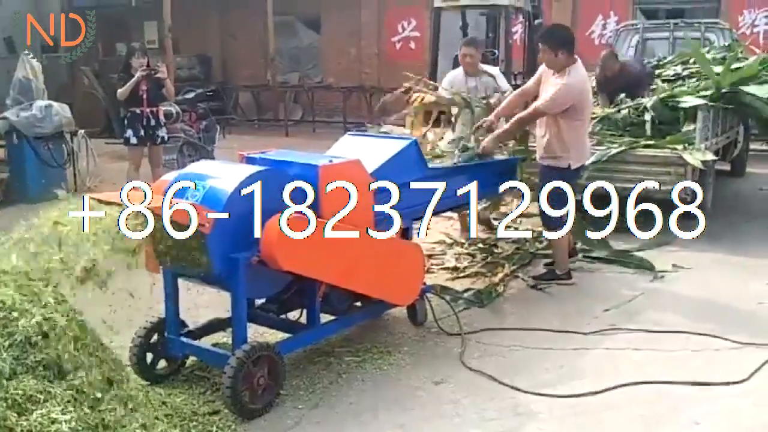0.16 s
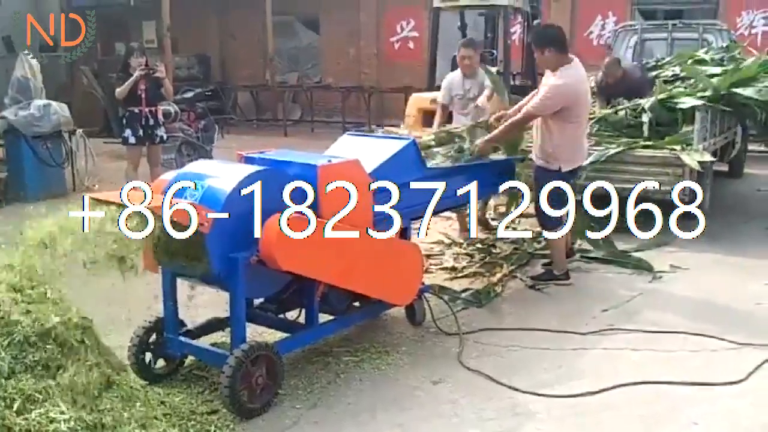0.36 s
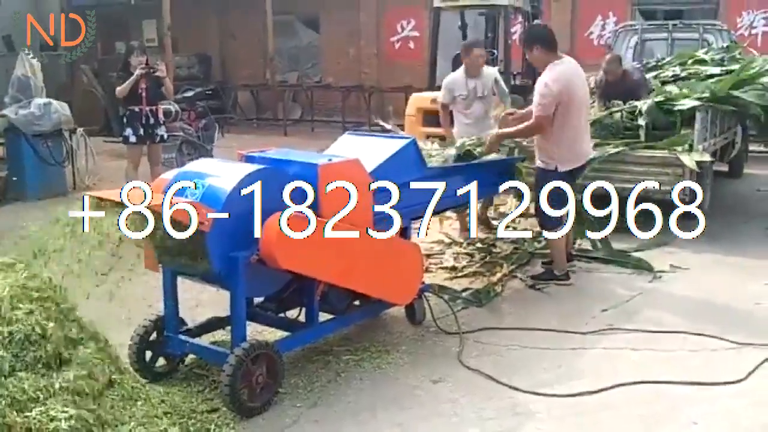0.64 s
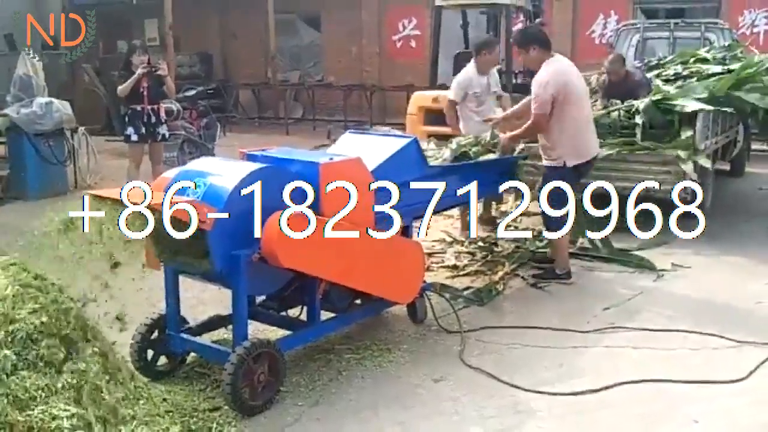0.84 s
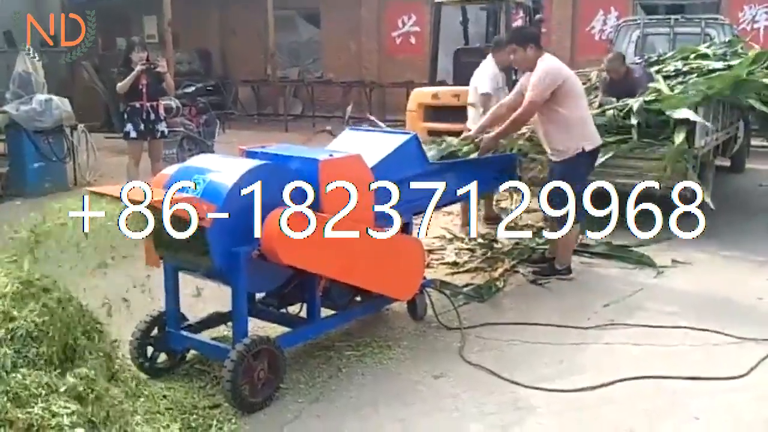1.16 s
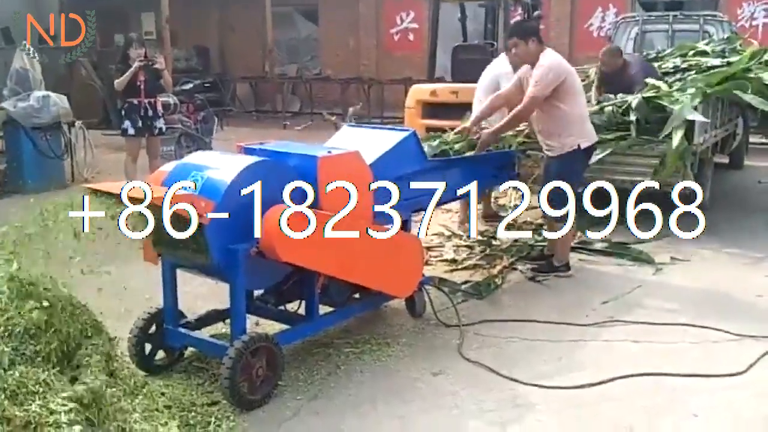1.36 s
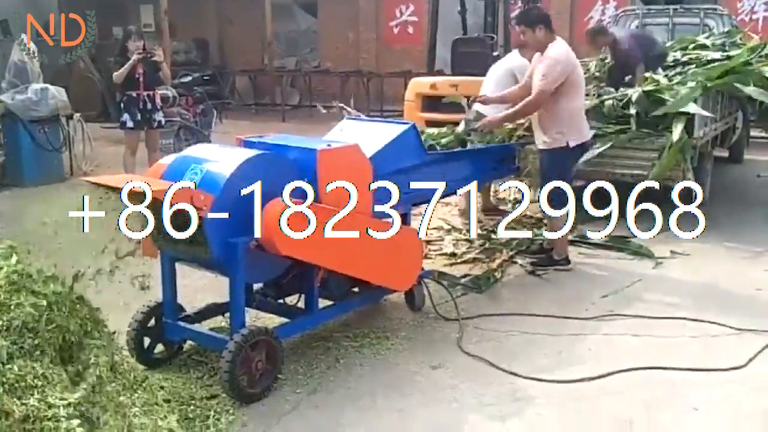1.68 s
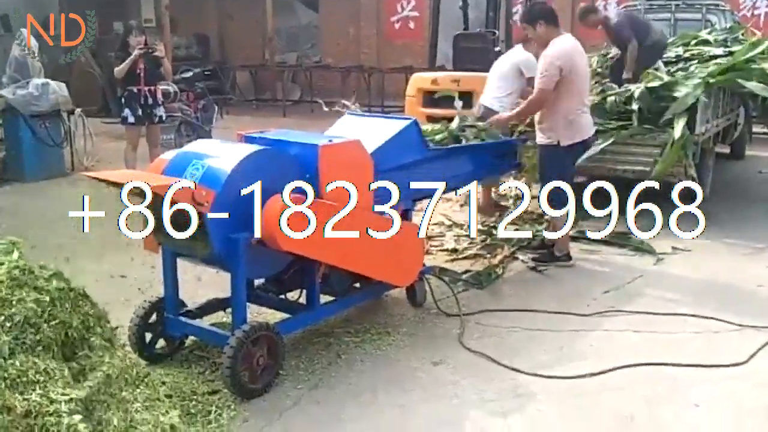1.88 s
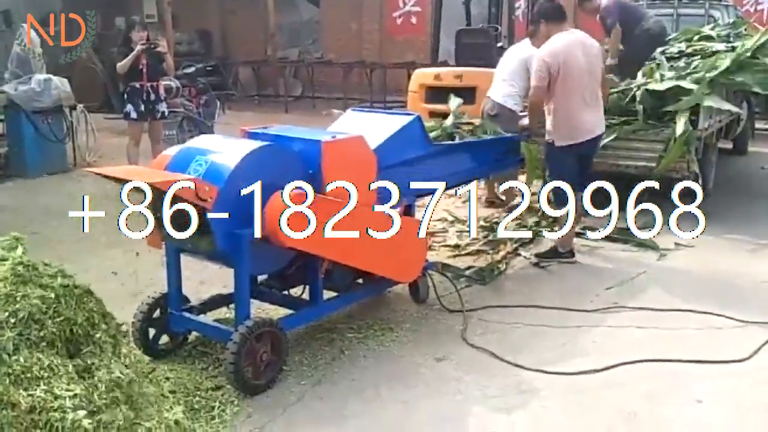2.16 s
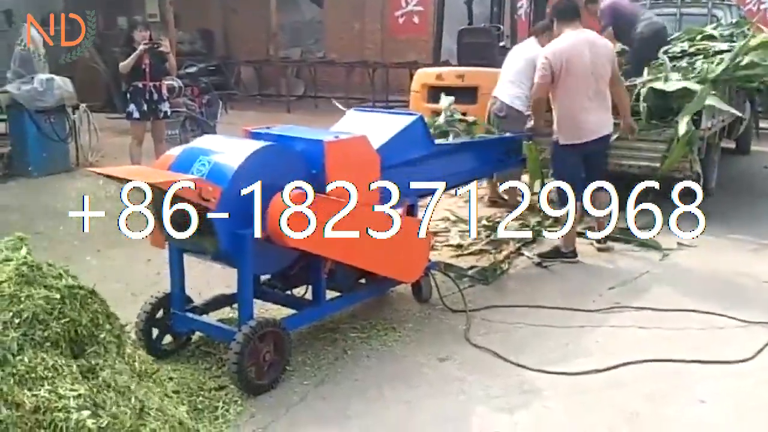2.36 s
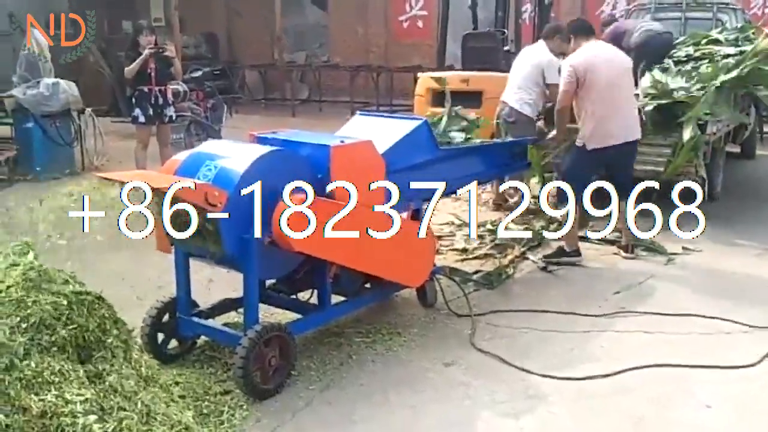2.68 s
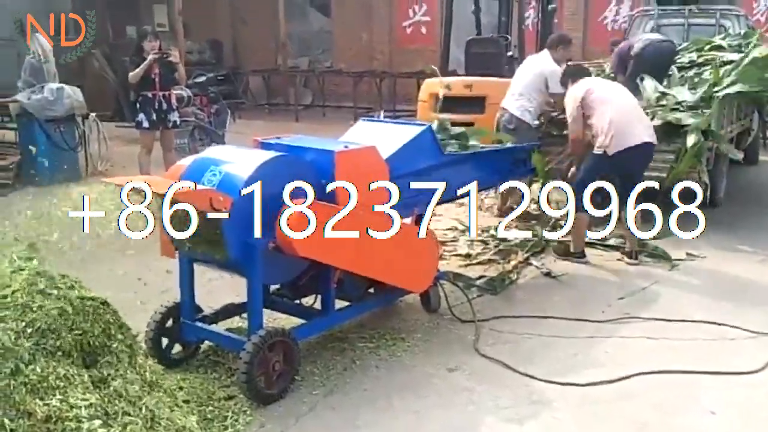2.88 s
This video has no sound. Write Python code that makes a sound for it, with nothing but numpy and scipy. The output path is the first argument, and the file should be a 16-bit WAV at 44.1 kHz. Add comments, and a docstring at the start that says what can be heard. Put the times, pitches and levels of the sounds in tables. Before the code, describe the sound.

Loud stalk-chopping machine outdoors, a few metres from a handheld microphone: low hum, rushing air and dense metallic rattle, easing around two seconds after wind buffeting on the right, then growing harsher toward the end.

```python
"""Chaff cutter in a windy yard

A motor-driven chaff cutter runs in an open yard, a few metres from a hand-held two-port microphone.
The knife drum hums as sines at multiples of its turning speed; air roars in the housing as shaped noise.
Cut stalk pieces pelt the sheet metal as dense ticks, more or less as the feed changes, and the outlet
chute rings as narrow bands of noise. A gust buffets the right port with low noise and short thumps."""
import sys
import numpy as np
from scipy import signal
from scipy.fft import rfft, irfft
from scipy.io import wavfile
from scipy.ndimage import uniform_filter1d

SR = 44100
rng = np.random.default_rng(int(sys.argv[2]) if len(sys.argv) > 2 else 0)


def store_pcm(level_fs):
    """Save levels as 16-bit WAV."""
    pcm = np.round(np.clip(level_fs, -1, 1) * 32767).astype(np.int16)
    wavfile.write(sys.argv[1], SR, np.atleast_2d(pcm).T)


def level_to_linear(level):
    """Convert decibel levels to linear amplitude factors, elementwise."""
    exponent = np.asarray(level, float) / 20
    return 10 ** exponent


N = 133182  # samples


def table(rows, col, at):
    """One column joined by straight lines."""
    rows = np.array(rows, float)
    return np.interp(at, rows[:, 0], rows[:, col])


def bin_hz():
    """Frequency of every FFT bin."""
    return np.arange(N // 2 + 1) * SR / N


def over_hz(rows, col):
    """One column on every FFT bin, joined on a log-frequency axis."""
    rows = np.array(rows, float)
    return np.interp(np.log(bin_hz() + 1), np.log(rows[:, 0]), rows[:, col])


def unit(x):
    """Scale to rms 1."""
    return x / np.sqrt(np.mean(x ** 2))


def walk(rate_hz):
    """Slow random wander: levels held for 1 / rate and smoothed twice; spread 1."""
    hold = int(SR / rate_hz)
    steps = np.repeat(rng.standard_normal(400), hold)[:N]
    smooth = uniform_filter1d(uniform_filter1d(steps, hold), hold)
    return unit(smooth - smooth.mean())


def bump(t, s, length):
    """A smooth bell-shaped swell centred on s; length is twice its standard deviation."""
    return np.exp(-.5 * ((t - s) / (length / 2)) ** 2)


# How the two ports hear a sound (f/Hz, likeness from 0 to 1, left minus right level/dB)
PORT_MATCH = [(60, 1, 9), (344, 1, -1), (865, 0.86, -1), (1213, 0.63, 2), (1340, 0, -3), (1820, 0.25, 1.5),
              (2560, 0.1, 6.5), (2660, 0.86, 2), (4600, 0.7, -0.5), (5560, 0, -3), (7340, 0.1, -10)]
RIGHT_LAG_S = .00006


def ports(a, b, gain):
    """Colour two unrelated streams and share them between the ports by likeness, balance and lag."""
    like = np.clip(over_hz(PORT_MATCH, 1), 0, 1)
    half = level_to_linear(over_hz(PORT_MATCH, 2) / 2)
    first, second = rfft(a) * gain, rfft(b) * gain
    lag = np.exp(-2j * np.pi * bin_hz() * RIGHT_LAG_S)
    left = first * half
    right = (like * first * lag + np.sqrt(1 - like ** 2) * second) / half
    return unit(np.array([irfft(left, N), irfft(right, N)]))


FLICKER_DB, FLICKER_HZ = 2.6, 28


def flicker(x):
    """Each quarter-octave band from 30 Hz up wavers in level on its own."""
    spec, out = rfft(x), 0
    step = np.clip(4 * np.log2(bin_hz() / 30 + 1e-9), 0, 32)
    for band in range(33):
        share = np.clip(1 - abs(step - band), 0, 1)  # neighbouring bands crossfade
        out = out + irfft(spec * share, N) * level_to_linear(FLICKER_DB * walk(FLICKER_HZ))
    return unit(out)


# Turning speed of the drum shaft (t/s, turns per s)
SHAFT_SPEED = [(0, 40.8), (.3, 41), (.6, 41.4), (1.1, 41.3), (2.2, 41.1), (2.55, 41.2), (2.7, 42),
               (3.02, 41.7)]


def shaft(t):
    """Angle of the knife drum in radians, adding up its turning speed."""
    return 2 * np.pi * np.cumsum(table(SHAFT_SPEED, 1, t)) / SR


HUM_WOBBLE_DB, HUM_WOBBLE_HZ = 1.2, 14
HUM_PORT_RAD = 0.098  # spread of the phase gap between ports; grows with the root of the order


def tone(angle, order, db):
    """A sine of the given rms level, wavering in level and a little out of step between the ports."""
    level = np.sqrt(2) * level_to_linear(db + HUM_WOBBLE_DB * walk(HUM_WOBBLE_HZ))
    start = 2 * np.pi * rng.random()
    drift = HUM_PORT_RAD * np.sqrt(order) * walk(HUM_WOBBLE_HZ) * np.array([[.5], [-.5]])
    return level * np.sin(angle + start + drift)


# The machine's changing loudness, also played by roar, sheet, chute and pelting
# (t/s, upper hum level/dB, air roar level/dB, pelting level/dB, pelting left minus right level/dB,
#  chute ring level/dB before CHUTE_DB, knife song level/dB)
MACHINE_LEVELS = [(0.0, -24, -23, -16.5, -3, -23, -30), (0.03, -28, -27, -19.5, -3, -37.5, -54),
                  (0.09, -26, -23.5, -19.5, -0.5, -25.5, -25), (0.25, -29, -22.5, -20.5, -1, -32, -54),
                  (0.31, -24, -21.5, -21, 0, -30.5, -24.5), (0.35, -21, -21.5, -23.5, -1, -29, -44.5),
                  (0.49, -27.5, -25.5, -20, 0.5, -32.5, -29.5), (0.53, -19, -22, -24, -0.5, -40, -38.5),
                  (0.59, -23.5, -24, -21.5, -0.5, -29, -42), (0.87, -25, -21, -22.5, 1, -32.5, -33.5),
                  (0.93, -24, -25, -22, -1, -25, -51.5), (1.02, -23, -20, -20, -1, -32, -32),
                  (1.19, -27, -22, -19.5, 1.5, -26.5, -41), (1.22, -30.5, -25, -25.5, -2.5, -42.5, -51),
                  (1.29, -25.5, -25.5, -27, -3, -47, -42), (1.33, -21, -23.5, -24, -2, -34.5, -35.5),
                  (1.77, -31.5, -26.5, -30.5, 2, -37, -43.5), (1.84, -31, -26, -31.5, 1, -39.5, -46),
                  (1.88, -34, -24, -30, 4, -28.5, -31), (1.93, -30.5, -24.5, -30, 3, -36, -47),
                  (2.0, -29, -24.5, -28.5, 4, -31, -41), (2.05, -26, -23.5, -24, 1, -30, -44),
                  (2.14, -29, -29.5, -21, 2.5, -23.5, -39.5), (2.17, -29, -24.5, -24.5, 3, -26.5, -45),
                  (2.35, -23.5, -26.5, -19, 2, -23.5, -34.5), (2.4, -23.5, -26.5, -21.5, 4, -26.5, -51.5),
                  (2.46, -17, -19.5, -20, 5, -25.5, -27.5), (2.54, -27.5, -26.5, -17, 1.5, -25, -49),
                  (2.66, -26.5, -23, -18, 1, -26, -25.5), (2.78, -23.5, -26.5, -16.5, -3.5, -20, -31.5),
                  (2.97, -22, -20.5, -17.5, -0.5, -21.5, -26.5), (3.02, -31, -23.5, -15.5, 1, -17, -30.5)]
# The main hum lines wax and wane each on its own
# (t/s, 2nd order level/dB, 3rd order level/dB, 4th order level/dB, feed-roller line level/dB)
HUM_LINES = [(0.0, -30.5, -32, -25, -46.5), (0.09, -35, -20, -39, -45), (0.15, -36.5, -35.5, -29.5, -22),
             (0.2, -35.5, -37.5, -27, -53.5), (0.28, -42, -28.5, -47.5, -42),
             (0.37, -38, -38.5, -28.5, -44), (0.43, -37, -33.5, -26.5, -41), (0.67, -35, -33.5, -32, -40.5),
             (0.73, -34.5, -26, -25.5, -40), (0.96, -31.5, -29.5, -31, -29), (1.04, -30, -24, -20.5, -28),
             (1.2, -43.5, -38.5, -37.5, -50), (1.29, -34.5, -35.5, -32, -37.5),
             (1.34, -29, -33.5, -23.5, -34.5), (1.4, -42.5, -26, -39.5, -43),
             (1.45, -45.5, -31, -22, -40.5), (1.56, -32, -31.5, -34.5, -48.5),
             (1.63, -33.5, -32.5, -23.5, -45), (1.69, -32, -25, -30, -44.5),
             (1.73, -43, -26.5, -36.5, -62.5), (1.78, -31.5, -28, -22.5, -35),
             (1.85, -41.5, -44, -37.5, -49.5), (1.93, -37.5, -31, -25.5, -40.5),
             (2.01, -39.5, -30, -27.5, -60), (2.05, -33, -33.5, -21.5, -39),
             (2.09, -41.5, -32.5, -35.5, -49), (2.32, -34, -31, -21.5, -43),
             (2.41, -37, -31.5, -37.5, -47.5), (2.51, -33, -29.5, -23.5, -41), (2.55, -34, -35, -23.5, -48),
             (2.62, -30, -24.5, -22.5, -41.5), (2.76, -35, -30.5, -25.5, -38), (2.91, -34, -30, -29, -38),
             (3.02, -40, -32, -26.5, -46.5)]
# Upper hum of the drum (shaft order, level/dB on top of the upper hum)
UPPER_ORDERS = [(7, -16), (8, -15.5), (10, -19), (12, -17)]
# Knife strikes that sing under load (shaft order, level/dB on top of the knife song)
SINGING_ORDERS = [(16, -9), (20, -11), (24, -3), (26, -4.5), (36, -12.5), (50, -9.5)]
ROLLER_HZ = 214.5


def drum(t):
    """Drum and knives sound at whole multiples (orders) of the shaft speed; the feed roller adds a line."""
    turn = shaft(t)

    def chord(orders):
        return sum(tone(k * turn, k, db) for k, db in orders)

    hum = sum(tone(k * turn, k, table(HUM_LINES, k - 1, t)) for k in (2, 3, 4))
    roller = tone(2 * np.pi * ROLLER_HZ * t, 5, table(HUM_LINES, 4, t))
    upper = chord(UPPER_ORDERS) * level_to_linear(table(MACHINE_LEVELS, 1, t))
    song = chord(SINGING_ORDERS) * level_to_linear(table(MACHINE_LEVELS, 6, t))
    return hum + roller + upper + song


# Colour of the air noise (f/Hz, relative level/dB per Hz)
ROAR_COLOUR = [(25, -18), (55, -8), (100, -2.5), (200, 0), (330, -0.5), (520, -5.5), (750, -1), (1100, -11),
               (1400, -9.5), (2500, -9.5), (5000, -55), (7400, -72)]


def roar(t):
    """Air thrown round the housing by the drum: shaped noise that flickers band by band."""
    air = ports(*rng.standard_normal((2, N)), level_to_linear(over_hz(ROAR_COLOUR, 1)))
    return flicker(air) * level_to_linear(table(MACHINE_LEVELS, 2, t))


PIECES_PER_S = 9000  # in each stream
PIECE_SPREAD_DB = 2.0  # average of the random boost
PIECE_TAIL_S = .004  # decay time before the spectrum is flattened


def pieces():
    """Two dense streams of ticks of uneven size, each smeared by a short tail; flat tail spectrum."""
    hit = rng.random((2, N)) < PIECES_PER_S / SR
    size = level_to_linear(PIECE_SPREAD_DB * rng.exponential(size=(2, N))) * rng.choice([-1, 1], (2, N))
    fade = np.exp(-np.arange(600) / SR / PIECE_TAIL_S)
    tail = rfft(fade * rng.standard_normal(600), N)
    return irfft(rfft(hit * size) * tail / (abs(tail) + 1e-9), N)


def mode(f, width, db):
    """One resonance: a peak at f that falls off on both sides."""
    return level_to_linear(db) / (1 + 2j * (bin_hz() - f) / width)


# Colour of the ticks (f/Hz, relative level/dB per Hz)
PELT_COLOUR = [(200, -34), (600, -12), (1000, -7), (1200, -5.5), (1420, -11), (1700, -9.5), (2000, -13.5),
               (3000, -3), (4650, -9), (4950, -11), (6500, -18.5), (7500, -24)]
# Housing panels rung by the pieces (f/Hz, width/Hz, level/dB against the plain ticks before colouring)
PANEL_MODES = [(674, 55, 1), (824, 160, -2.5), (1847, 210, 6.5), (2770, 45, -9), (3900, 210, -11),
               (4296, 110, -3.5)]
CLUMP_DB, CLUMP_HZ = .4, 40
KNIVES, KNIFE_BEAT_DB = 2, .8  # the pelting pulses at each knife pass


def sheet(t):
    """Cut pieces tick on the sheet metal and ring its panels, a little stronger at each knife pass."""
    ring = 1 + sum(mode(*m) for m in PANEL_MODES)
    ticks = flicker(ports(*pieces(), ring * level_to_linear(over_hz(PELT_COLOUR, 1))))
    clumps_db = CLUMP_DB * walk(CLUMP_HZ)
    beat_db = KNIFE_BEAT_DB * np.cos(KNIVES * shaft(t))
    return ticks * level_to_linear(table(MACHINE_LEVELS, 3, t) + clumps_db + beat_db)


# Narrow cluster in which the outlet chute rings (f/Hz, width/Hz, relative level/dB)
CHUTE_MODES = [(2210, 70, -9), (2304, 45, -2), (2390, 50, -2.5), (2445, 40, -2.5), (2520, 70, -5)]
CHUTE_DB, CHUTE_WAVER_DB, CHUTE_WAVER_HZ = 1.5, 2.2, 30


def chute(t):
    """The outlet chute rings: noise through narrow resonances, each wavering on its own."""
    ring = 0
    for f, width, db in CHUTE_MODES:
        level = level_to_linear(db + CHUTE_WAVER_DB * walk(CHUTE_WAVER_HZ))
        ring = ring + level * ports(*rng.standard_normal((2, N)), mode(f, width, 0))
    return unit(ring) * level_to_linear(table(MACHINE_LEVELS, 5, t) + CHUTE_DB)


# Thick wads of stalk through the knives (t/s, level/dB over the pelting, length/s)
STALK_WADS = [(1.172, 6, .014), (2.45, 2, .04), (2.675, 3, .012), (2.728, 2, .012), (2.775, 3, .012),
              (2.95, 3, .012), (2.974, 3, .01)]


def pelting(t):
    """Sheet metal and chute together swell with each thick wad and shift between left and right."""
    wads_db = sum(db * bump(t, s, length) for s, db, length in STALK_WADS)
    pan_db = table(MACHINE_LEVELS, 4, t)
    return (sheet(t) + chute(t)) * level_to_linear(wads_db + np.array([pan_db, -pan_db]) / 2)


# Colour of the gust (f/Hz, relative level/dB per Hz)
WIND_COLOUR = [(25, -8.5), (60, -1), (100, 2.5), (160, 1), (350, -10), (700, -18), (1500, -52.5)]
# Wind thumps on the right port (t/s, peak level/dB, length/s, f/Hz)
WIND_THUMPS = [(1.345, -18, 0.016, 120), (1.398, -21.5, 0.012, 99), (1.418, -18.5, 0.0085, 262),
               (1.435, -11, 0.0049, 132.6), (1.462, -12.5, 0.0091, 118.7), (1.484, -10, 0.0092, 110.4),
               (1.508, -7, 0.0036, 324), (1.519, -14.5, 0.0096, 91), (1.551, -3.5, 0.0088, 103),
               (1.58, -11.5, 0.011, 80.2), (1.598, -18, 0.015, 196), (1.645, -15.5, 0.013, 128.6),
               (1.669, -20.5, 0.014, 95.6), (1.691, -16, 0.012, 95), (1.73, -18, 0.019, 120.4),
               (1.792, -18, 0.017, 95)]
GUST_S, GUST_LENGTH_S, GUST_DB = 1.52, 0.26, -19.5


def wind(t):
    """A low gust of noise with single pressure thumps (brief sines), on the right port only."""
    noise = unit(irfft(rfft(rng.standard_normal(N)) * level_to_linear(over_hz(WIND_COLOUR, 1)), N))
    gust = noise * level_to_linear(GUST_DB) * bump(t, GUST_S, GUST_LENGTH_S)
    thumps = 0
    for s, db, length, hz in WIND_THUMPS:
        wave = np.sin(2 * np.pi * (hz * (t - s) + rng.random()))
        thumps = thumps + level_to_linear(db) * bump(t, s, length) * wave
    return np.array([[0], [1]]) * (gust + thumps)


def scene():
    """Drum, roar, pelting and wind together."""
    t = np.arange(N) / SR
    return drum(t) + roar(t) + pelting(t) + wind(t)


def roll_off(x):
    """The treble ends steeply here."""
    return signal.sosfilt(signal.butter(12, 7600, fs=SR, output="sos"), x)


CEILING = .8  # amplitude that rounded peaks approach
TOP_HZ = 7700


def record(dry):
    """The microphone path softly rounds the peaks and cuts the top."""
    soft = CEILING * np.tanh(dry / CEILING)
    low_pass = signal.ellip(10, .2, 80, TOP_HZ, fs=SR, output="sos")
    mix = signal.sosfilt(low_pass, soft)
    return roll_off(mix)


dry = scene()
out = record(dry)
store_pcm(out)
```